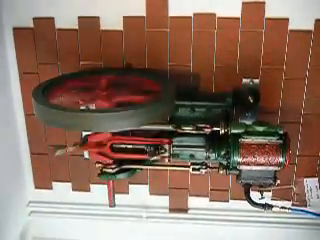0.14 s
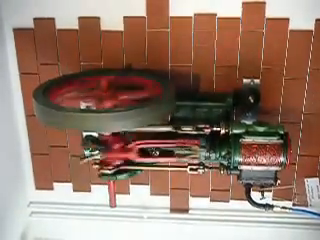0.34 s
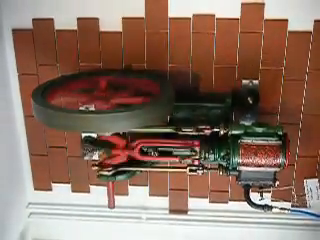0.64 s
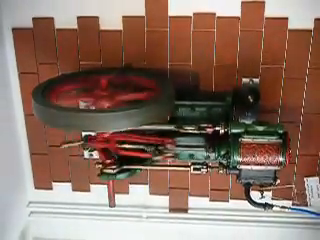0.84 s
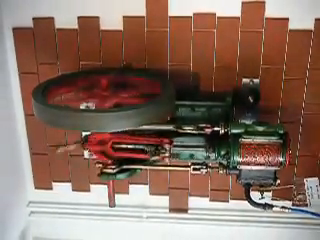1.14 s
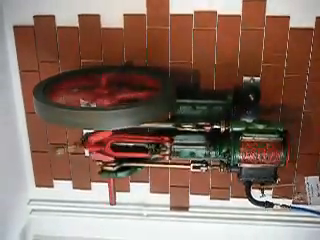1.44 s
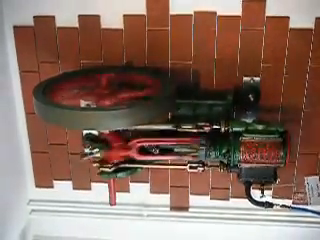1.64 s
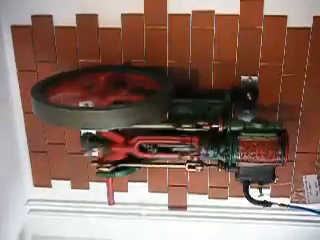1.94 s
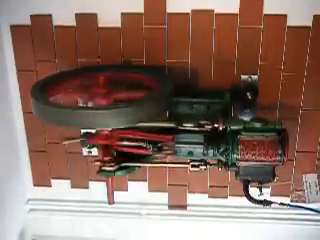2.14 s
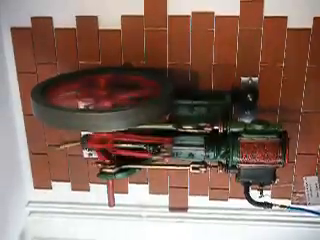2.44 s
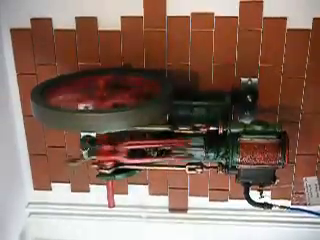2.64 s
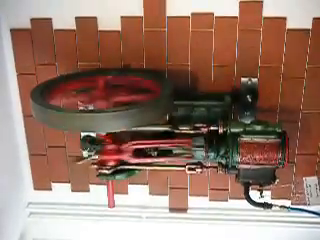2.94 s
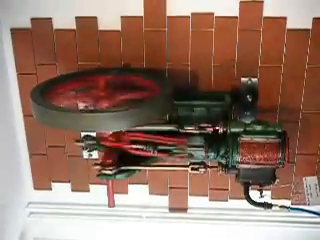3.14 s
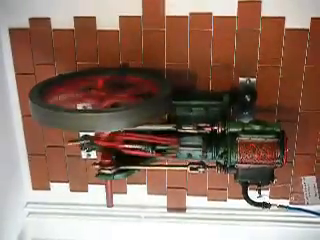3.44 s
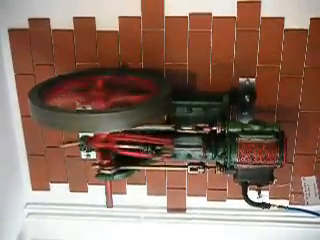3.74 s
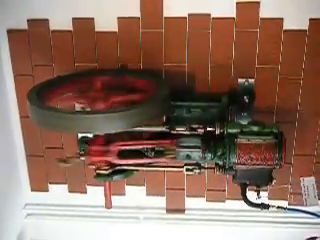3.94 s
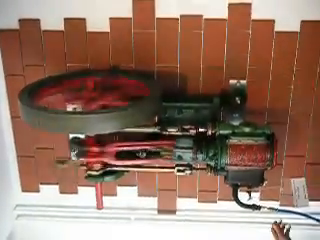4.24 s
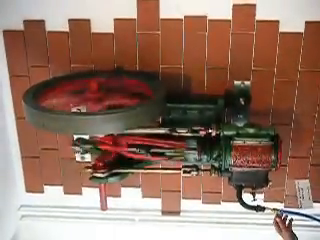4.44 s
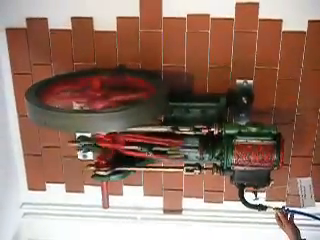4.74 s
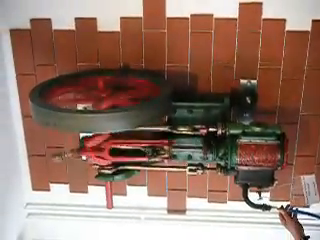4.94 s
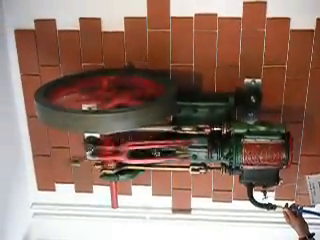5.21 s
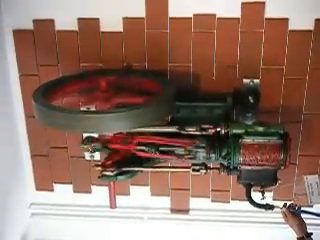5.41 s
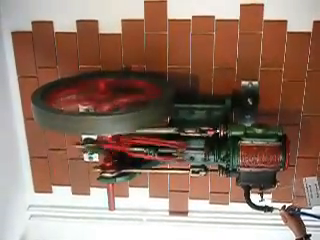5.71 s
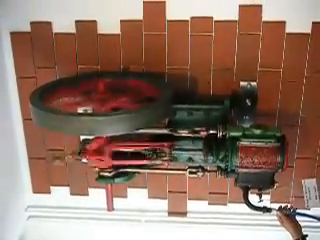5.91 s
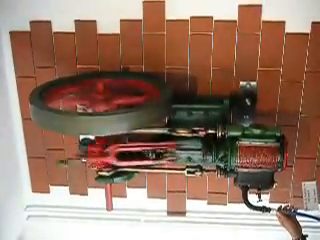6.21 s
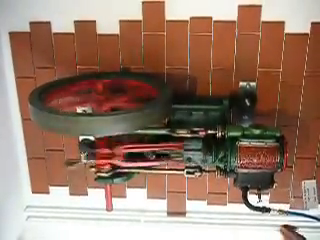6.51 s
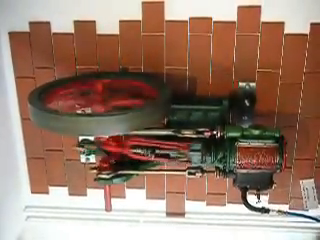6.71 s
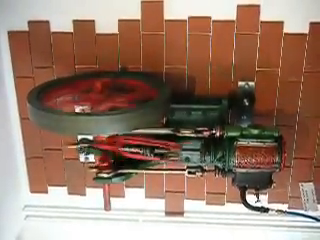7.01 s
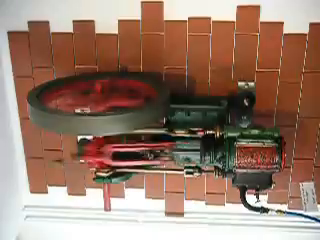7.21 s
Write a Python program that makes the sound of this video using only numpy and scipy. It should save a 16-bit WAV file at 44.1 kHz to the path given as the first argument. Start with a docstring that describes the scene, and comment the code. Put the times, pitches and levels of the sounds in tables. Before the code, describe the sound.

Fast, even chuff-and-knock beat of a little piston engine driven through a hose, metallic and hissing, heard close up in a small room.

```python
"""A longer hissing chuff opens, then a short knocking one; the pair repeats about three times a second.
It is a model horizontal steam engine, fed through a hose, in a room: each chuff is grainy noise rung by a port.
A steady hiss, a valve leak, a rattling valve rod and the sliding crosshead fill the gaps, also as shaped noise.
All of it rings through resonances of the body; a small camera close by catches it at a low sample rate."""
import sys
import numpy as np
from scipy import signal
from scipy.fft import rfft, irfft, next_fast_len
from scipy.io import wavfile
from scipy.ndimage import uniform_filter1d, minimum_filter1d, map_coordinates

SR = 44100
rng = np.random.default_rng(int(sys.argv[2]) if len(sys.argv) > 2 else 0)


def store_wav(level_fs):
    """Save 16-bit WAV to argv[1]."""
    pcm = np.round(np.clip(np.atleast_2d(level_fs), -1, 1) * 32767)
    wavfile.write(sys.argv[1], SR, pcm.T.astype(np.int16))


N = 324576


def amp(db):
    """Decibels to amplitude factor."""
    return 10 ** (np.asarray(db) / 20)


def unit(x):
    """The signal scaled to an rms of 1."""
    return x / np.sqrt(np.mean(x ** 2) + 1e-20)


def along(points, hz):
    """Values between (Hz, value) points, read on a log frequency axis."""
    point_hz, values = np.transpose(points)
    return np.interp(np.log(hz + 1), np.log(point_hz + 1), values)


def over_time(points):
    """Values at every sample between (seconds, value) points."""
    return np.interp(np.arange(N) / SR, *np.transpose(points))


def wobble(rate):
    """A smooth random curve with rate knots a second."""
    knots = rng.standard_normal(int(N * rate / SR) + 4)
    return map_coordinates(knots, [np.arange(N) * rate / SR])


def filtered(x, response):
    """The sound shaped by a complex response of frequency."""
    size = next_fast_len(N + SR // 2)  # spare room for ringing
    hz = np.fft.rfftfreq(size, 1 / SR)
    return irfft(rfft(x, size) * response(hz), size)[:N]


def rush(spectrum, grain_db):
    """Coloured noise of rms 1, broken into grains of about a millisecond."""
    grains = amp(grain_db * wobble(700))
    noise = rng.standard_normal(N) * grains
    return unit(filtered(noise, lambda hz: amp(along(spectrum, hz))))


def resonate(x, peaks):
    """Each resonance lifts its own narrow band and rings on; a negative one cuts a notch."""
    def response(hz):
        gain = 1
        for centre, width, db in peaks:
            damping = 1j * hz * width
            band = damping / (centre * centre - hz * hz + damping)
            gain = gain * (1 + (amp(db) - 1) * band)
        return gain
    return filtered(x, response)


# How the flywheel turns: it gathers a little speed, then falters once.
# Each row: time in seconds, turns completed.
CRANK_TURNS = [(-.1854, -1), (.4872, 1), (1.148, 3), (2.1178, 6), (4.9928, 15), (6.28, 19), (6.614, 20),
               (7.585, 23)]


def each_turn(angle):
    """The moments in seconds at which the crank passes an angle given in turns."""
    seconds, turns = np.transpose(CRANK_TURNS)
    return np.interp(np.arange(turns[0], turns[-1]) + angle, turns, seconds)


def swells(times, strength, attack_s, hold_s, decay_s, scatter_db):
    """A rise, hold and exponential fall at each time, randomly uneven in strength; powers sum."""
    t, power = np.arange(N) / SR, np.zeros(N)
    levels = np.interp(times, *np.transpose(strength)) + scatter_db * rng.standard_normal(len(times))
    for at, db in zip(times, levels):
        near = slice(*np.searchsorted(t, [at - 1 / 4, at + 1 / 2]))
        age = t[near] - at
        rise = (np.minimum(age, 0) / attack_s) ** 2  # the rise comes before the given time
        fall = np.maximum(age - hold_s, 0) / decay_s
        power[near] += (amp(db) * np.exp(-rise - fall)) ** 2
    return np.sqrt(power)


# How long the walls ring. Each row: frequency in Hz, time to fall 60 dB in seconds.
ROOM_DECAY = [(200, 0.28), (1500, 0.4), (7000, 0.067)]


def room(x):
    """The walls answer with a short diffuse tail of noise whose decay depends on pitch."""
    hz, t, grid = signal.stft(rng.standard_normal(SR // 2), SR, nperseg=256)
    decay = amp(-60 * t / along(ROOM_DECAY, hz)[:, None])
    tail = signal.istft(grid * decay, SR, nperseg=256)[1]
    delayed = np.pad(x, (200, 0))  # samples before the first reflection
    return signal.fftconvolve(delayed, tail / np.linalg.norm(tail))[:N]


# Colour of the steady running noise. Each row: frequency in Hz, relative level in dB per Hz.
STEADY_COLOUR = [(25, -9.5), (70, -20), (110, -14.5), (170, -9), (320, -2), (600, -5), (900, -5),
                 (1500, -2.5), (2100, -2.5), (2700, -14), (4000, -15), (6000, -13), (7200, -34)]


def running():
    """Escaping air and the turning shaft never fall silent, but ease at both dead centres."""
    dead_centre_turn = 0.39  # the piston stops here and half a turn on
    piston_speed = np.abs(np.sin(2 * np.pi * (over_time(CRANK_TURNS) - dead_centre_turn)))
    level = amp(-28.0 + 3 * piston_speed + 0.75 * wobble(25))
    return level * rush(STEADY_COLOUR, grain_db=2.0)


# Colours of the crosshead's slide, the bearing knock and the bright steel clack.
# Each row: frequency in Hz, relative level in dB per Hz.
SLIDE_COLOUR = [(30, -22), (90, -29.5), (140, -6), (210, -5), (295, 2.5), (360, 2), (500, -1), (620, -6.5),
                (820, -7), (1100, -3.5), (1600, -6.5), (2200, -9.5), (3000, -18), (7000, -31)]
KNOCK_COLOUR = [(100, -26), (550, -21), (850, 2), (1150, 2), (1600, -1.5), (2200, -3.5), (3200, -20.5),
                (7000, -22.5)]
STEEL_COLOUR = [(200, -28), (600, -15), (900, 0), (1300, -2), (2200, 1), (2800, -11), (4000, -5.5),
                (6000, -17.5), (7200, -22)]
# Slow changes in strength of the slide and the knock. Each row: time in seconds, relative level in dB.
SLIDE_STRENGTH = [(.15, -3), (.5, 4), (1.2, -1), (2.4, -4), (3.1, 0), (3.9, -4), (4.6, 1), (5.3, -2),
                  (6.7, 2)]
KNOCK_STRENGTH = [(.15, -14), (.5, -9), (1.15, -9.5), (2.45, -10.5), (2.75, -18.5), (3.08, -9.5),
                  (3.85, -19), (4.6, -10.5), (5.1, -13.5), (6.6, -9), (7.3, -14.5)]


def linkage():
    """The rod clacks and chatters in its bearings as the load reverses; the crosshead rubs along its guide."""
    knock_turn, slide_turn = 0.023, .38  # turns after the outward exhaust
    slide = amp(-26) * swells(each_turn(slide_turn), SLIDE_STRENGTH,
                              attack_s=0.11, hold_s=0.043, decay_s=0.024, scatter_db=0.3)
    knock = amp(-10.5) * swells(each_turn(knock_turn), KNOCK_STRENGTH,
                                attack_s=0.02, hold_s=0.01, decay_s=0.04, scatter_db=1)
    clack = amp(-13) * swells(each_turn(0), KNOCK_STRENGTH,
                              attack_s=0.0032, hold_s=.003, decay_s=0.0074, scatter_db=2.5)
    sliding = slide * rush(SLIDE_COLOUR, grain_db=3.5)
    knocking = knock * rush(KNOCK_COLOUR, grain_db=2.5)
    clacking = clack * rush(STEEL_COLOUR, grain_db=2.5)
    return sliding + knocking + clacking


# Slow changes in the strength of the rattle. Each row: time in seconds, relative level in dB.
VALVE_STRENGTH = [(.6, -11.5), (2.2, -13), (3.5, -11), (4.5, -8), (5.8, -9.5), (7.1, -5)]


def valve_gear():
    """A short loose steel rattle once a turn, just before the return stroke blows off."""
    valve_turn = 0.403  # turns after the outward exhaust
    drift_turn_per_s = 0.0059  # the valve rod takes up its play ever later
    times = each_turn(valve_turn)
    times = each_turn(valve_turn + drift_turn_per_s * times)
    times = times + rng.normal(-0.0058, 0.0036, len(times))  # loose timing, seconds
    rattle = swells(times, VALVE_STRENGTH, attack_s=.004, hold_s=.003, decay_s=0.019, scatter_db=1.5)
    return amp(-12.5) * rattle * rush(STEEL_COLOUR, grain_db=0.5)


# Colour of the valve leak. Each row: frequency in Hz, relative level in dB per Hz.
LEAK_COLOUR = [(100, -32), (300, 0.5), (600, -13), (900, -2), (1500, -3), (2200, 4.5), (2700, -10.5),
               (4000, -13.5), (6000, -7), (7200, -47)]
# Slow changes in the strength of the leak. Each row: time in seconds, relative level in dB.
LEAK_STRENGTH = [(.3, -2), (1.3, 2), (2.3, -1.5), (3.4, 1), (4, -3), (6.3, 3.5), (7.2, -0.5)]


def valve_leak():
    """Air seeps past the valve as a soft hiss ahead of the return exhaust."""
    leak_turn = 0.449  # turns after the outward exhaust
    seep = swells(each_turn(leak_turn), LEAK_STRENGTH,
                  attack_s=0.012, hold_s=0.036, decay_s=0.023, scatter_db=0.2)
    return amp(-24.5) * seep * rush(LEAK_COLOUR, grain_db=2.5)


# Colours of the outward and return puffs. Each row: frequency in Hz, relative level in dB per Hz.
OUTWARD_COLOUR = [(30, -20), (90, -28), (300, -5), (600, -19), (800, -9.5), (1300, -4), (2000, -0.5),
                  (2600, -6.5), (3300, -8), (4000, -9), (5200, -6.5), (6300, -15.5), (7200, -67.5)]
RETURN_COLOUR = [(30, -20), (90, -22), (300, -21), (600, -15.5), (800, -5.5), (1300, -0.5), (2000, -1),
                 (2600, -5.5), (3300, -7), (4000, -7), (5200, -8), (6300, -17.5), (7200, -36)]
# Resonances of the port at each end of the cylinder. Each row: centre in Hz, width in Hz, lift in dB.
OUTWARD_RESONANCES = [(1140, 58, 4), (1630, 46, 5.5), (1780, 60, 5.5), (2760, 100, 7), (3290, 58, 4),
                      (4370, 59, 3), (5080, 78, 0.5)]
RETURN_RESONANCES = [(1565, 89, 2.8), (2354, 140, 5.8), (3220, 56, 3.3), (3530, 94, 5.3), (4430, 100, 4.6),
                     (4620, 90, 3.3)]
# Slow changes in the strength of each puff. Each row: time in seconds, relative level in dB.
OUTWARD_STRENGTH = [(.15, -8.5), (.5, -6.5), (1.5, -7), (2.1, -11.5), (3.1, -7.5), (4.7, -8.5),
                    (5.5, -10.5), (7.3, -9)]
RETURN_STRENGTH = [(0, -.5), (.7, 0.28), (2, -1.1), (3.6, .7), (5.1, 0), (7.2, -1.2)]


def exhaust():
    """Both cylinder ends blow off in turn: a burst as the port opens, a tail as the piston sweeps air out."""
    out_s = each_turn(0) - .003
    back_s = each_turn(0.5565)  # turns after the outward exhaust
    out_burst = amp(-9.0) * swells(out_s, OUTWARD_STRENGTH,
                                   attack_s=0.0054, hold_s=0.0037, decay_s=0.0064, scatter_db=0.4)
    out_tail = amp(-19.0) * swells(out_s, OUTWARD_STRENGTH,
                                   attack_s=0.015, hold_s=0.0094, decay_s=0.068, scatter_db=0.4)
    back_burst = amp(-18.5) * swells(back_s, RETURN_STRENGTH,
                                     attack_s=0.0058, hold_s=0.0039, decay_s=0.013, scatter_db=0.4)
    back_tail = amp(-24.5) * swells(back_s, RETURN_STRENGTH,
                                    attack_s=0.015, hold_s=0.011, decay_s=0.077, scatter_db=1.2)
    short_chuff = np.hypot(out_burst, out_tail) * rush(OUTWARD_COLOUR, grain_db=1.5)
    long_chuff = np.hypot(back_burst, back_tail) * rush(RETURN_COLOUR, grain_db=1.5)
    return resonate(short_chuff, OUTWARD_RESONANCES) + resonate(long_chuff, RETURN_RESONANCES)


# Slow rise and fall with pressure. Each row: time in seconds, gain in dB.
PRESSURE_GAIN = [(0, -0.54), (3.2, 0), (5.6, 1.1), (7.36, 0.5)]
# Resonances of the castings, exhaust passage and base. Each row: centre in Hz, width in Hz, lift in dB.
BODY_RESONANCES = [(307, 21, 2), (501, 16, 2.5), (745, 59, 8.5), (822, 9.7, 3.5), (880.9, 20.7, 15),
                   (945, 27, 5.5), (1169, 77, 6.5), (1412, 14, 5.5), (1528, 55, 7), (1597, 57, 9),
                   (1810, 93, 3.5), (2052, 51, 8.5), (2157.4, 28.3, 11), (2298, 45, 7), (2340, 16, 4.5),
                   (2839, 103, 9.5), (3180, 33, 12), (3357, 79, 8), (3533, 47, 8), (3520, 61, -2.5),
                   (4373, 28, 6), (4500, 43, 5), (4685, 14, 10.5), (5100, 58, 4.5), (5270, 250, -7.5),
                   (5540, 37, 6.5), (5744, 43, 8), (5746, 53, 4), (6340, 92, 10.5), (6950, 30, 11.5)]


def scene():
    """All parts sound through the engine's body; pressure lifts the linkage and the running noise."""
    effort = amp(over_time(PRESSURE_GAIN))
    moving_parts = effort * (running() + linkage())
    engine = resonate(moving_parts + valve_gear() + valve_leak() + exhaust(), BODY_RESONANCES)
    return (engine + amp(-17) * room(engine))[None]


def tick():
    """One faint, very bright tick: a burst of treble noise that dies in milliseconds."""
    t = np.arange(N) / SR - 3.956  # seconds from the tick
    burst = amp(-23) * (t > 0) * amp(-60 * np.abs(t) / .003)
    return burst * rush([(3000, -30), (7000, 0), (15000, -6)], grain_db=0)


def limited(x, ceiling):
    """The gain ducks for a few milliseconds around any peak above the ceiling."""
    needed = ceiling / np.maximum(np.abs(x), ceiling)
    return x * uniform_filter1d(minimum_filter1d(needed, size=220), size=220)


def record(dry):
    """The camera holds peaks down and joins slow samples by straight lines, mirroring hiss into the treble."""
    camera_sr, band_hz, top_hz = 15750, 7050, 15700  # slow sample rate, its band edge, final cutoff, all Hz
    x = limited(dry[0], ceiling=.85)
    x = filtered(x, lambda hz: 1 / np.sqrt(1 + (hz / band_hz) ** 200))
    slow = signal.resample(x, round(N * camera_sr / SR))
    joined = np.interp(np.arange(N) / N, np.arange(len(slow)) / len(slow), slow)
    x = joined + tick()
    offset = .094  # constant shift of the waveform
    return filtered(x, lambda hz: hz < top_hz)[None] + offset


dry = scene()
out = record(dry)
store_wav(out)
```